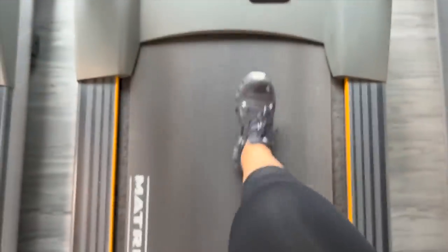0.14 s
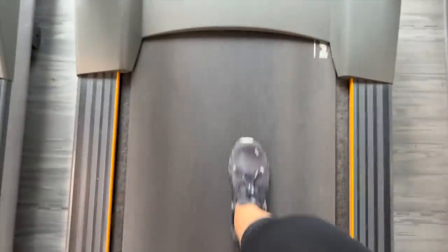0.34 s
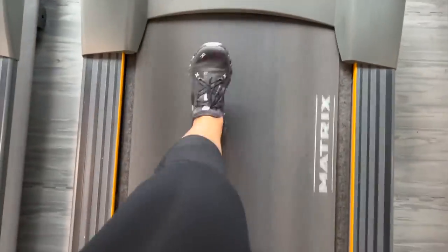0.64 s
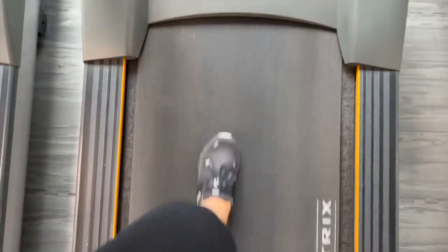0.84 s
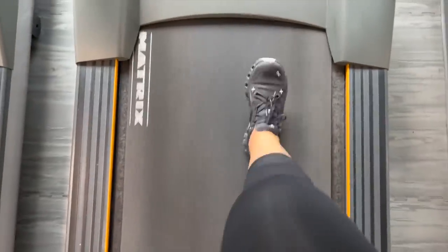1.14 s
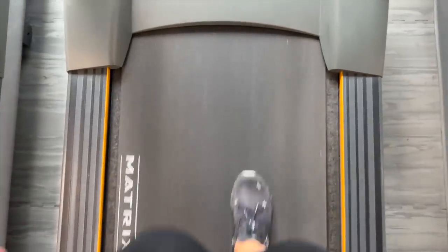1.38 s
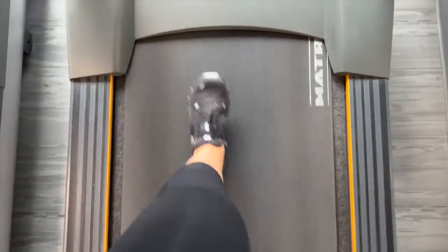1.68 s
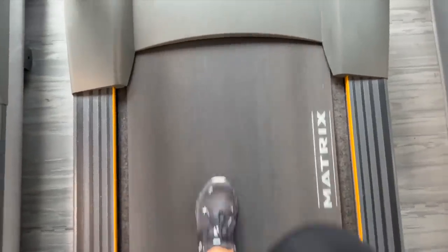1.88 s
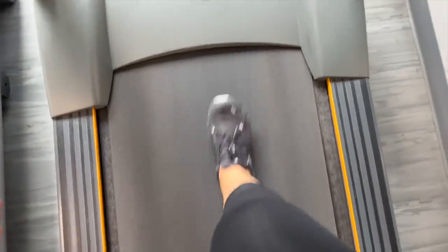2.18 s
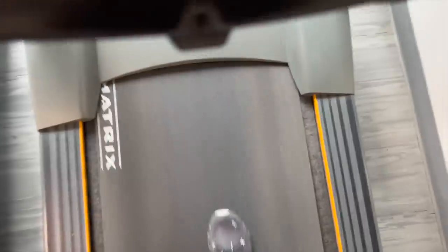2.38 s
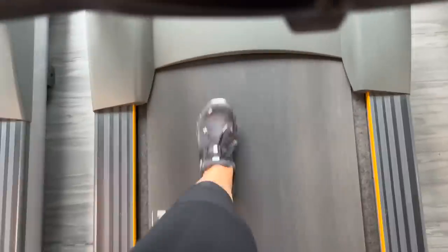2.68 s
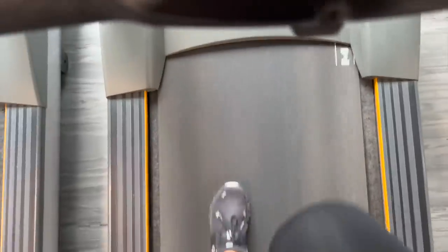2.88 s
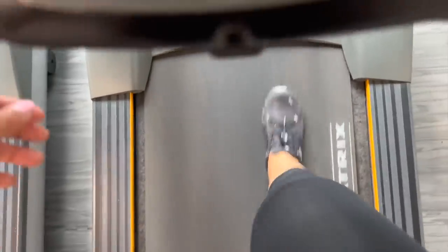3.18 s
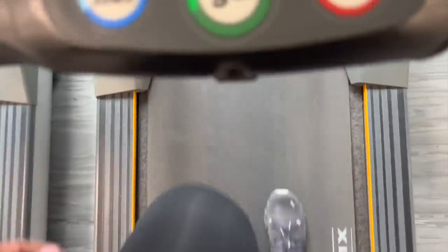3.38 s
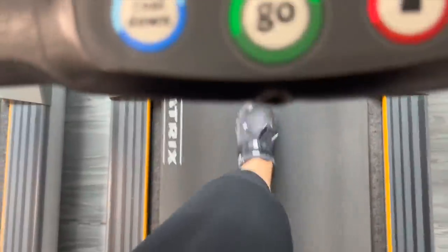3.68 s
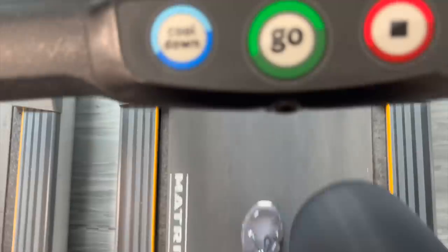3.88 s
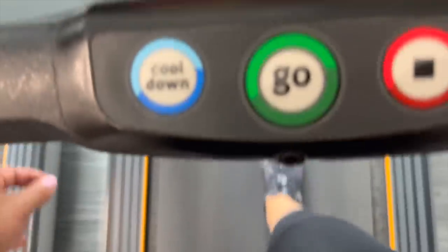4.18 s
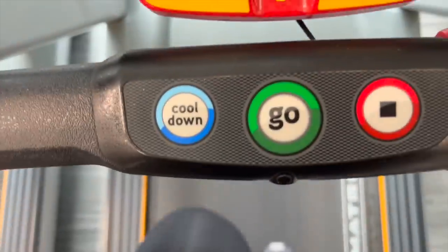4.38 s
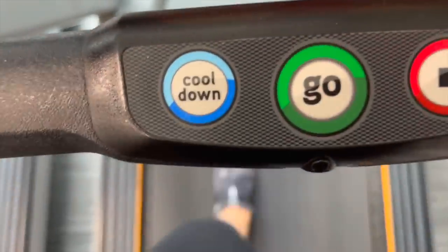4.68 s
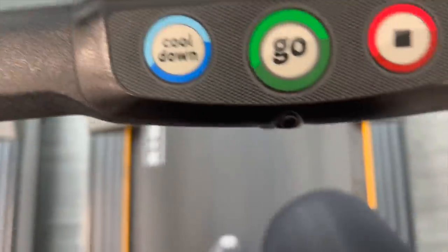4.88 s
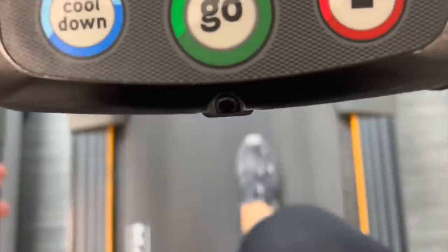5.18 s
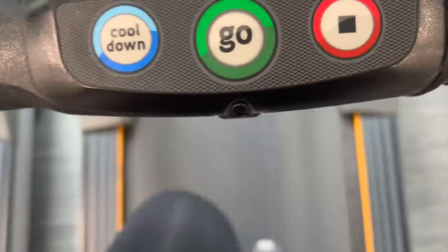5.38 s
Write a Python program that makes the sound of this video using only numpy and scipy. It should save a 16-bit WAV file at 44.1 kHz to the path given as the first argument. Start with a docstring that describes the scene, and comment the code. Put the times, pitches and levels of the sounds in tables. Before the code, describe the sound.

A treadmill is already running at the start, heard close up from above the belt in a gym. Its rollers make a steady low rumble, the sliding belt gives a grainy hiss, and the motor hums with a faint, wavering whine.

At about 0.2 seconds footsteps begin and continue evenly, about two a second, eleven in all, the last near 5.1 seconds. Each has a heel tap and scuff, a dull thud into the ringing deck, then a hollow slap of the sole, with a very short room echo. The first three slaps are the sharpest, and the step near 3.6 seconds is softer. Faint shoe squeaks and swishes come now and then, around 0.4, 1.9, 2.4, 3.8 and 4.2 seconds. The machine keeps the same speed until the end at about 5.5 seconds.

```python
"""A treadmill in a gym, heard close up from a phone held above the belt.
From the start the rollers rumble, the belt hisses and sings over the ringing deck and the motor whines.
From 0.2 s someone strides on it, about two steps a second: the heel taps and scuffs, the weight thuds
into the deck, then the sole slaps down with a hollow pop and the room answers briefly.
Now and then a shoe squeaks. Feet and machine keep their pace to the end."""
import sys
import numpy as np
from scipy import signal
from scipy.fft import rfft, irfft, next_fast_len
from scipy.io import wavfile
from scipy.ndimage import map_coordinates

SR = 44100
rng = np.random.default_rng(int(sys.argv[2]) if len(sys.argv) > 2 else 0)


def unload_audio(sound):
    """Save the sound as a 16-bit wav file, at the path given as the first command line argument."""
    columns = np.transpose(np.atleast_2d(sound))
    # keep every value between -1 and 1, then stretch to whole-number steps
    steps = np.round(np.clip(columns, -1, 1) * 32767)
    wavfile.write(sys.argv[1], SR, steps.astype(np.int16))


N = 244332
SIZE = 2 * next_fast_len(N // 2 + 1, True)
TIME, FREQ = np.arange(N) / SR, np.fft.rfftfreq(SIZE, 1 / SR)
BLOW_TIME = TIME[:SR // 4]

# heel landings, each level on its own scale: t/s, tap/dB, tick/dB, scuff/dB, thud/dB, thud f/Hz, crack/dB
HEELS = [(0.211, -13.5, -54, -35, -18, 120, -31), (0.686, -19, -53, -34, -12, 99, -33),
         (1.183, -14.5, -46.5, -40, -15, 137, -29), (1.67, -28, -58, -35, -7, 131, -44),
         (2.155, -21, -51, -32.5, -10, 141, -37), (2.642, -14, -54, -35, -6, 94, -38),
         (3.129, -15, -53, -38, -7, 125.6, -33), (3.604, -22, -57, -35, -12, 112, -44),
         (4.103, -15, -50, -39, -7.5, 96, -34), (4.594, -25, -56, -34, -11, 74, -32),
         (5.085, -15, -48, -31, -6, 144, -36)]
# phase of left against right channel, opposed near 10 kHz: f/Hz, lead/rad
CHANNEL_LEAD = [(100, 0), (1100, .6), (1600, -1), (2800, .4), (5000, .8), (6000, -1.4), (7000, 0),
                (8700, -1.4), (9150, -3.1), (11000, -3.2), (11600, -4.9), (12400, -6.2), (14900, -6.3),
                (15700, -9)]
RIGHT_LAG = np.exp(-1j * np.interp(FREQ, *np.transpose(CHANNEL_LEAD)))


def steps(deck_db=-18, board_db=-7, room_db=-10):
    """The foot rolls down from heel to toes and rings the deck and the room; the weight thuds below."""
    blows, cracks = np.zeros(N), np.zeros((2, N))
    heel_taps(blows, cracks)
    sole_slaps(blows, cracks)
    soft_knocks(blows, cracks)
    board = resonance(hz=590, width=70)  # short ring of the running board, damped by the foot
    rung = filtered(blows, 1 + gain_of(deck_db) * deck() + gain_of(board_db) * board)
    direct = np.array([rung, filtered(rung, RIGHT_LAG)]) + cracks
    return direct * gain_of([[-.2], [.2]]) + gain_of(room_db) * gym(rung) + weight_thuds()


def heel_taps(blows, cracks, heel_hz=695, spread=0.036):
    """Adds each heel's tap, tick of tread and crack; no two heels land at the same pitch."""
    for s, tap_db, tick_db, *_, crack_db in HEELS:
        tap = knock(heel_hz * (1 + spread * rng.uniform(-0.82, 1)), rise=0.00086)
        tick = snap(1500, 6100, decay=0.0042)
        add(blows, s, gain_of(tap_db) * tap + gain_of(tick_db + 13.5) * tick)
        add_crack(cracks, s, crack_db, 900, 2150)


def sole_slaps(blows, cracks):
    """Adds each sole's slap: squeezed air pops and flutters, and the tread ticks."""
    # sole landings: t/s, pop/dB, air f/Hz, rise/s, flutter/dB, crack/dB, tick/dB
    slaps = [(0.244, -8.5, 670, 0.0019, -24.5, -24.5, -43), (0.7215, -9, 555, 0.0027, -28, -26, -36),
             (1.215, -9.5, 670, 0.0017, -26, -28.5, -32), (1.705, -14.5, 630, 0.0019, -24.5, -30, -43),
             (2.194, -14.5, 600, 0.0016, -27, -28, -26), (2.678, -15.5, 595, 0.0024, -19.5, -26, -46),
             (3.167, -11, 730, 0.0014, -27, -32, -48), (3.65, -24.5, 600, 0.003, -36, -41, -49),
             (4.134, -18.5, 564, 0.0025, -21, -36, -55), (4.628, -13.5, 620, 0.0022, -26.5, -33, -45),
             (5.123, -13, 635, 0.0028, -28.5, -25, -37)]
    for s, pop_db, hz, rise, flutter_db, crack_db, tick_db in slaps:
        pop = gain_of(pop_db) * knock(hz, rise, bend=0.03)
        flutter = gain_of(flutter_db) * snap(540, 890, decay=0.017)
        tick = gain_of(tick_db) * snap(2500, 8000, decay=0.0013)
        add(blows, s, pop + flutter + tick)
        add_crack(cracks, s, crack_db, 810, 1780)


def soft_knocks(blows, cracks):
    """Adds softer knocks as forefoot and toes roll down or the belt flaps on the deck."""
    # knocks around the steps: t/s, level/dB, f/Hz, rise/s, crack/dB
    flaps = [(0.133, -23, 616, 0.0019, -41), (0.218, -23, 680, .0015, -32),
             (0.257, -15, 598, 0.0026, -26.5), (0.265, -19, 567, 0.0011, -35),
             (0.272, -28, 676, 0.0028, -36), (0.694, -19, 637, .003, -32), (0.7295, -23, 554, .0013, -23),
             (0.7385, -18, 558, .004, -30), (0.754, -25, 593, .003, -35), (1.129, -26, 650, .002, -41),
             (1.16, -26, 676, 0.00085, -46), (1.229, -15.5, 604, 0.0019, -26),
             (1.2355, -14.5, 640, 0.0011, -31), (1.245, -21, 570, 0.0027, -31),
             (1.715, -21, 644, .003, -34), (2.163, -18.5, 627, 0.0046, -34), (2.204, -25, 616, 0.0033, -31),
             (2.243, -29, 650, 0.0011, -39), (2.688, -21, 560, .0025, -30), (2.702, -19.5, 603, .003, -29),
             (3.578, -22.5, 616, 0.0026, -46), (3.642, -27, 647, .0014, -34),
             (4.059, -18.5, 610, .0018, -35), (4.143, -16.5, 565, 0.003, -33),
             (4.153, -18.5, 600, .0022, -35), (4.583, -24, 647, .0014, -29), (4.618, -19, 720, 0.0022, -34),
             (4.642, -22, 570, 0.0025, -39), (4.682, -19, 620, 0.0032, -37),
             (5.143, -21.5, 563, 0.0019, -40)]
    for s, db, hz, rise, crack_db in flaps:
        add(blows, s, gain_of(db) * knock(hz, rise, bend=0.05))
        add_crack(cracks, s, crack_db, 820, 1630)


def add_crack(cracks, s, db, low_hz, high_hz):
    """Adds a snap of rubber scattered by the frame, so each microphone hears its own."""
    for side in cracks:
        add(side, s, gain_of(db) * snap(low_hz, high_hz, decay=0.008))


def weight_thuds(delay_s=0.01045):
    """The body's weight sinks into the deck just after each heel."""
    thuds = np.zeros(N)
    for s, *_, db, hz, _ in HEELS:
        add(thuds, s + delay_s, gain_of(db - 13) * knock(hz, rise=0.016))
    return thuds


def deck():
    """Frequency response of the ringing deck and frame."""
    # their modes: f/Hz, width/Hz, level/dB
    modes = [(56, 2, -4), (95.7, 13.4, 3), (123, 10.6, 3), (145.2, 3.9, 2.5), (174.3, 7.3, 0.5),
             (231, 10, -11), (301.6, 4.2, -4.5), (322, 9.6, -2), (367, 12, -9.5), (417.5, 13, -6.5),
             (575, 4.9, -15), (608, 7.3, -0.5)]
    return sum(gain_of(db) * resonance(hz, width) for hz, width, db in modes)


def scuffs(rise_s=0.0019, decay_s=0.032):
    """The shoe grazes the belt as it is pulled up to belt speed."""
    # friction spectrum: f/Hz, relative level/dB
    spectrum = [(200, 3.5), (550, 4.5), (800, 1), (1100, -4), (2000, -14), (3500, -19), (9000, -62),
                (16000, -30)]
    contact = sum(gain_of(db + 10) * np.exp(-np.maximum((s - TIME) / rise_s, (TIME - s) / decay_s))
                  for s, _, _, db, *_ in HEELS)
    return contact * stereo_noise(gain_of(read(spectrum, FREQ)))


def squeaks():
    """Shoe rubs on belt: narrow bands of friction noise swell and fade."""
    # squeaks and swishes: t/s, length/s, f/Hz, width/Hz, level/dB
    rubs = [(0.394, 0.089, 1470, 50, -40), (0.722, 0.008, 1870, 695, -28), (1.942, 0.14, 1516, 110, -39.5),
            (2.36, 0.17, 1474, 80, -42), (2.733, 0.065, 4500, 300, -46), (3.06, 0.04, 1700, 220, -38.5),
            (3.747, .11, 4540, 550, -46), (3.77, 0.035, 2740, 750, -38.5), (3.825, 0.15, 1510, 110, -37),
            (3.844, 0.076, 4480, 500, -45), (4.055, 0.15, 4640, 500, -48.5), (4.15, 0.043, 1490, 70, -34),
            (5.12, 0.043, 1550, 70, -39)]
    return sum(gain_of(db) * bump(TIME - s, length) * noise_band(hz, width)
               for s, length, hz, width, db in rubs)


def belt(stride_s=0.976, first_ease_s=0.53):
    """The belt slides over the deck, easing off once a stride and hissing louder under each heel."""
    # slow course of the friction: t/s, hiss/dB, singing/dB
    levels = [(0, -43.5, -41), (0.9, -43.5, -45.5), (1.45, -44, -39), (1.9, -42.5, -45), (2.45, -43, -38),
              (3.2, -43.5, -46), (3.85, -41.5, -42.5), (4.4, -43.5, -37), (4.85, -42.5, -43.5),
              (5.4, -42.5, -37.5), (5.54, -44, -42)]
    hiss_db, sing_db = curves(levels)
    from_ease = (TIME - first_ease_s + stride_s / 2) % stride_s - stride_s / 2
    eased = bump(from_ease, length=0.52)
    pressed = each_step(delay=0.021, length=0.06)
    hiss = gain_of(hiss_db + 1.5 * pressed + 6.5) * belt_hiss(eased)
    return hiss + gain_of(sing_db - 10 * eased + 1.5) * belt_singing()


def belt_hiss(eased, grain_db=0.55, patchy_db=1.5):
    """A grainy hiss in four bands that flicker on their own; three dip as the belt eases."""
    # colour of the hiss as heard, with a gap near 10 kHz: f/Hz, relative level/dB
    colour = [(300, -3), (800, 20.5), (1080, 8), (1900, 6.5), (2250, 5), (2600, 4.5), (2950, 4),
              (3500, 0.5), (5200, -1.8), (6800, -4), (8500, -5), (10400, -14), (11700, -1), (15500, -10.5)]
    hiss = stereo_noise(gain_of(read(colour, FREQ)))
    dull = lowpass(hiss, 3300, power=4)
    bright, air = (hiss - lowpass(hiss, hz, power=12) for hz in (6200, 10000))
    bands = dull, hiss - dull - bright, bright - air, gain_of(-0.5) * air
    dips_db = -3, 0, -3.5, -1
    ease = eased - eased.mean()
    return sum(band * gain_of(dip_db * ease + grain_db * drift(150) + patchy_db * drift(22))
               for band, dip_db in zip(bands, dips_db))


def belt_singing(flicker_db=2.5):
    """The sliding belt sings in rough bands that waver in pitch and level."""
    # singing bands: f/Hz, width/Hz, relative level/dB
    bands = [(1504, 63, -2.5), (2276, 170, -10), (3020, 27, -13.5), (4520, 670, -12)]
    return sum(gain_of(db + flicker_db * drift(22)) * wavering(noise_band(hz, width), share=0.016, hz=9)
               for hz, width, db in bands)


def rollers(landing_db=2.5, stance_db=-2):
    """Rollers shake the frame; the deep part swells at each landing and is damped while the foot stands."""
    # rumble spectrum: f/Hz, relative level/dB
    spectrum = [(15, -46), (30, -17.5), (56, -7.5), (90, -1.5), (160, 0.5), (220, -7.5), (310, -6.5),
                (420, -9), (490, -13), (800, -17), (1050, -37.5), (1600, -30.5), (4000, -81)]
    # slow course of the deep rumble: t/s, gain/dB
    depth = [(0, -0.5), (0.6, -3), (1.3, -1.5), (1.9, 0.5), (2.6, -2.7), (3.3, 1.5), (3.9, 1.9),
             (4.4, -0.7), (5.54, 0.8)]
    load_db = landing_db * each_step(0.035, 0.26) + stance_db * each_step(0.12, 0.1) + curves(depth)[0]
    rumble = gain_of(-26.5) * stereo_noise(gain_of(read(spectrum, FREQ)))
    shake = rumble + gain_of(-30) * stereo_noise(abs(deck()))
    deep = lowpass(shake, 230, power=4)
    return deep * gain_of(load_db + np.array([[-.7], [.7]])) + (shake - deep) * gain_of([[.2], [-.2]])


def motor(drone_hz=(561.5, 603.3), electronics_hz=14227):
    """The motor hums, drones on two tones and whines; its drive electronics add a thin high line."""
    # hum of the drive: f/Hz, relative level/dB, wander/Hz
    hum_tones = [(58.2, -43, 0.5), (96, -40, 2), (107.3, -42, 0.6), (132, -41, 2), (174, -38, 2),
                 (267.7, -46, 0.5), (334.5, -37.5, 2), (366, -43, 2)]
    # levels of the droning tones: t/s, lower/dB, upper/dB
    drone_levels = [(0, -45, -32.5), (1.0, -38, -40), (2.0, -38.5, -33.5), (3.0, -35.5, -37.5),
                    (3.6, -37.5, -33.5), (4.4, -39, -37), (4.9, -35.5, -38), (5.54, -35.5, -33)]
    hum = sum(tone(hz, wander, db - 1.8) for hz, db, wander in hum_tones)
    drone = sum(tone(hz, 0.77, db) for hz, db in zip(drone_hz, curves(drone_levels)))
    return hum + drone + motor_whine() + tone(electronics_hz, wander_hz=8, level_db=-62)


def motor_whine(lower_hz=1264.5, upper_hz=2890.5, flicker_db=2.2):
    """The drive whines on two tones, the upper one flickering and rough."""
    # course of each tone: t/s, relative level/dB
    lower_levels = [(0.0, -38), (0.03, -46), (0.48, -42), (0.54, -50.5), (1.45, -41.5), (1.5, -45.5),
                    (1.7, -47.5), (1.8, -53), (1.87, -44), (2.16, -45.5), (2.31, -49), (2.36, -43),
                    (2.7, -51), (2.87, -42.5), (3.67, -43), (3.7, -47), (3.89, -39), (4.3, -41),
                    (4.33, -46.5), (4.77, -44), (4.83, -39), (5.09, -41), (5.12, -56), (5.15, -42),
                    (5.26, -38), (5.54, -45.5)]
    upper_levels = [(0.0, -60), (0.01, -51.5), (0.6, -58), (0.68, -51), (0.89, -57), (0.92, -45.5),
                    (1.02, -54), (1.23, -49), (1.27, -61), (1.56, -51), (1.8, -58), (2.17, -45),
                    (2.22, -59), (2.44, -47), (2.61, -54.5), (4.01, -49.5), (4.4, -59), (4.44, -44),
                    (4.49, -58), (4.63, -56), (4.69, -59), (4.86, -47), (5.26, -55.5), (5.54, -48)]
    lower_db, upper_db = curves(lower_levels)[0], curves(upper_levels)[0]
    lower = tone(lower_hz, 1.0, lower_db + 4, lead=np.pi / 3)
    upper = tone(upper_hz, 0.82, upper_db + 3.5 + flicker_db * drift(18), lead=np.pi / 8)
    rasp = gain_of(upper_db - 9) * noise_band(upper_hz, width=90)
    return lower + upper + rasp


def gym(x, reflections_per_s=3000):
    """The room returns sparse reflections of random sign, each band dying at its own speed."""
    # reverberation: f/Hz, t60/s
    decay_times = [(150, 0.12), (700, 0.14), (3000, 0.11), (12000, 0.01)]
    taps = rng.choice([-1., 1.], (2, SR // 2)) * (rng.random((2, SR // 2)) < reflections_per_s / SR)
    taps[:, :SR // 250] = 0  # no reflection in the first 4 ms
    hz, t, spectra = signal.stft(taps, SR, nperseg=256)
    fade = gain_of(-60 * t / read(decay_times, hz)[:, None])
    tail = signal.istft(spectra * fade, SR, nperseg=256)[1]
    return signal.fftconvolve(x[None], tail / np.linalg.norm(tail[0]), axes=1)[:, :N]


def knock(hz, rise, bend=0):
    """A soft-edged ring, loudest after rise seconds; its pitch starts higher by the share bend."""
    age = BLOW_TIME / rise
    pitch = hz * (1 + bend * np.exp(-age))
    return age * np.exp(1 - age) * np.sin(2 * np.pi * np.cumsum(pitch) / SR)


def snap(low_hz, high_hz, decay):
    """A burst of noise from rubber meeting belt."""
    band = signal.butter(2, [low_hz, high_hz], "band", fs=SR)
    burst = signal.lfilter(*band, rng.standard_normal(len(BLOW_TIME)))
    return unit_rms(burst) * np.exp(-BLOW_TIME / decay)


def tone(hz, wander_hz, level_db, lead=0):
    """A wavering sine that flutters slightly; the left channel leads by lead radians."""
    phase = 2 * np.pi * np.cumsum(hz + wander_hz * drift(5.4)) / SR
    return gain_of(level_db + drift(9)) * np.sin([phase, phase - lead])


def stereo_noise(colour):
    """Coloured noise of rms 1; left and right channels are partly alike, and opposed near 10 kHz."""
    # likeness of the channels: f/Hz, coherence/0-1
    coherence = [(60, .99), (140, .93), (220, .9), (340, .92), (520, .8), (900, .38), (1600, .2),
                 (2800, .35), (4200, .15), (6000, .3), (8600, .65), (9200, .995), (11400, .995),
                 (12400, .94), (14800, .95), (15600, .6)]
    alike = np.interp(FREQ, *np.transpose(coherence))
    shared, own = rfft(rng.standard_normal((2, SIZE)))
    right = (alike * shared + np.sqrt(1 - alike ** 2) * own) * RIGHT_LAG
    return unit_rms(irfft(np.array([shared, right]) * colour, SIZE)[:, :N])


def noise_band(hz, width):
    """A narrow band of stereo noise."""
    return stereo_noise(resonance(hz, width) ** 2)


def resonance(hz, width):
    """Response of one mode, gain 1 at its centre."""
    return 1j * FREQ * width / (hz ** 2 - FREQ ** 2 + 1j * FREQ * width)


def wavering(x, share, hz):
    """Lets the pitch of a sound wander by a small share, about hz times a second."""
    place = TIME + share * np.cumsum(drift(hz)) / SR
    return np.array([map_coordinates(side, [place * SR], order=3, mode="mirror") for side in x])


def drift(hz):
    """A random curve of rms 1, with up to about hz changes a second."""
    return unit_rms(filtered(rng.standard_normal(SIZE), np.exp(-np.minimum(FREQ / hz, 10) ** 2)))


def each_step(delay, length):
    """A bump delay seconds after every heel."""
    return sum(bump(TIME - s - delay, length) for s, *_ in HEELS)


def bump(offset, length):
    """A smooth 0-1 swell about length seconds wide, peaking at zero offset."""
    return np.exp(-(2 * offset / length) ** 2)


def lowpass(x, hz, power):
    """Keeps what lies below hz; a higher power cuts more steeply."""
    return filtered(x, 1 / (1 + (FREQ / hz) ** power))


def filtered(x, response):
    """Passes a sound through a frequency response."""
    return irfft(rfft(x, SIZE) * response, SIZE)[..., :N]


def add(mix, s, sound):
    """Lays a sound into the mix at time s."""
    part = mix[round(s * SR):][:len(sound)]
    part += sound[:len(part)]


def curves(rows):
    """Every column of a time table, sample by sample."""
    s, *columns = np.transpose(rows)
    return [np.interp(TIME, s, column) for column in columns]


def read(points, hz):
    """Reads a table on a log-frequency axis."""
    f, value = np.transpose(points)
    return np.interp(np.log(hz + 1), np.log(f + 1), value)


def gain_of(db):
    """Decibels to amplitude."""
    return 10 ** (np.asarray(db) / 20)


def unit_rms(x):
    """Scales to rms 1."""
    return x / np.sqrt(np.mean(x ** 2) + 1e-20)


def scene():
    """The machine and the feet on it, from just above the belt."""
    return rollers() + belt() + motor() + scuffs() + squeaks() + steps()


def record(dry):
    """The phone cuts the treble above 15.75 kHz."""
    band_limit = signal.firwin(511, 15750, window=("kaiser", 9), fs=SR)
    return signal.oaconvolve(dry, band_limit[None], "same")


dry = scene()
out = record(dry)
unload_audio(out)
```